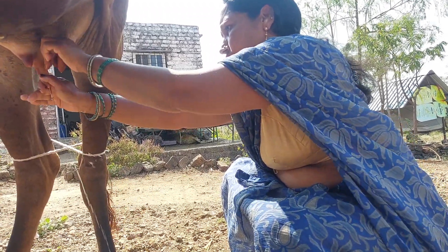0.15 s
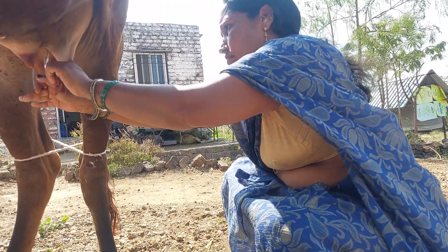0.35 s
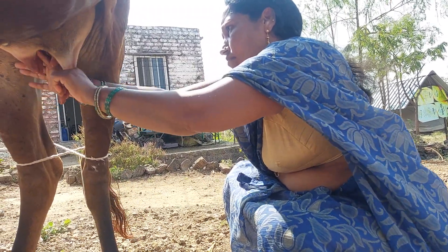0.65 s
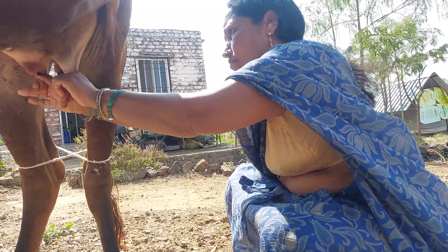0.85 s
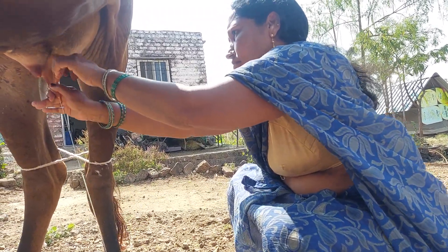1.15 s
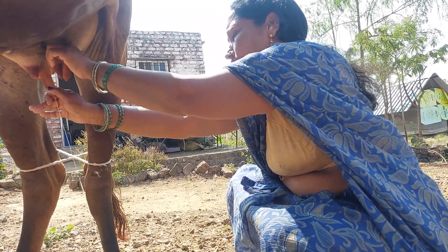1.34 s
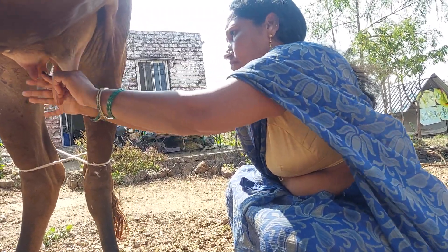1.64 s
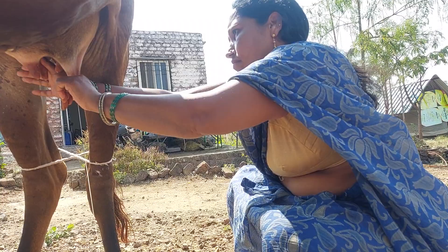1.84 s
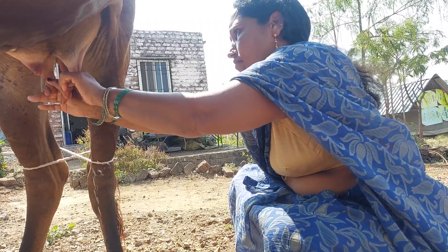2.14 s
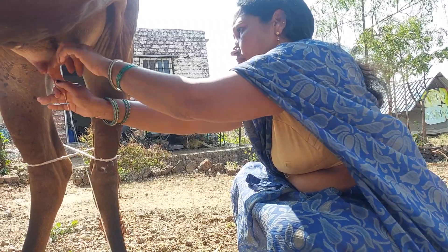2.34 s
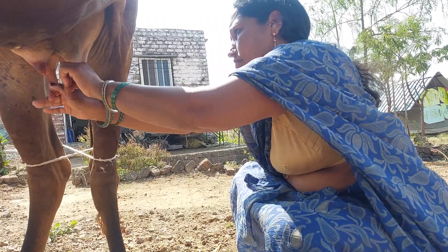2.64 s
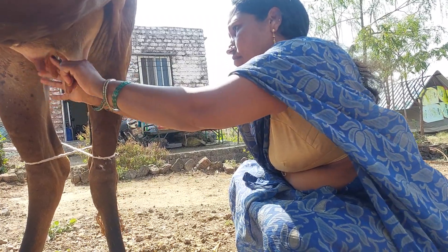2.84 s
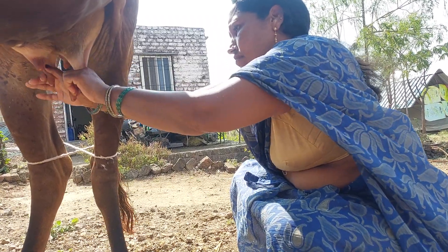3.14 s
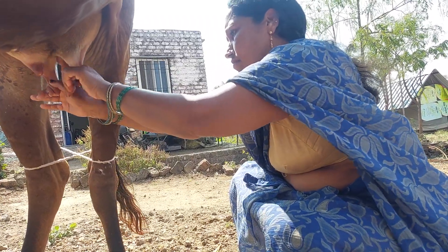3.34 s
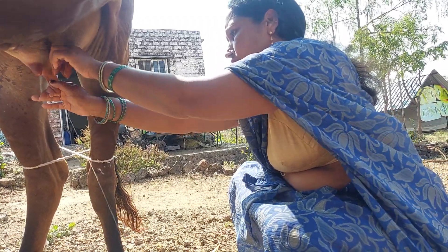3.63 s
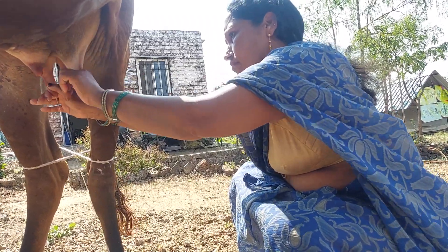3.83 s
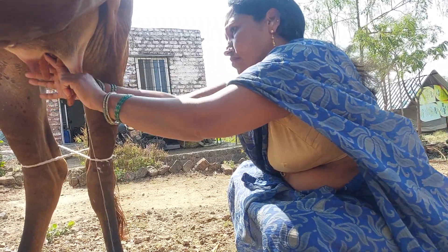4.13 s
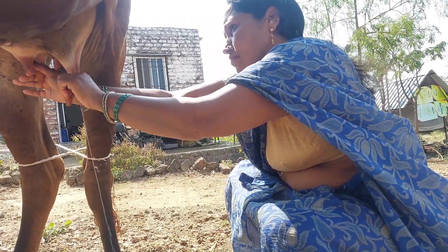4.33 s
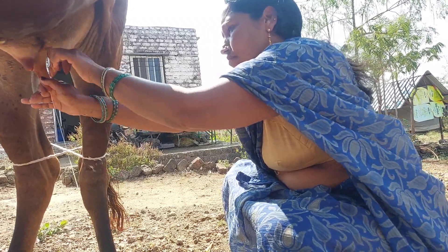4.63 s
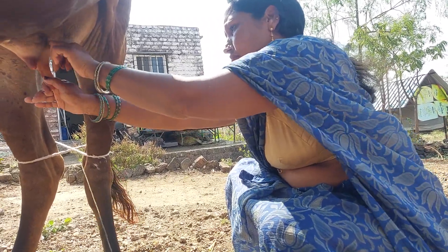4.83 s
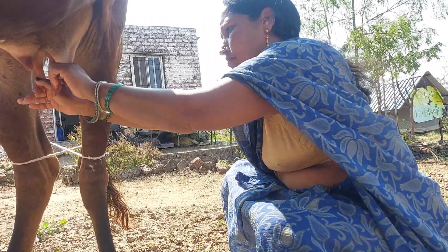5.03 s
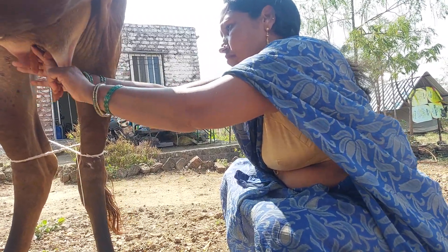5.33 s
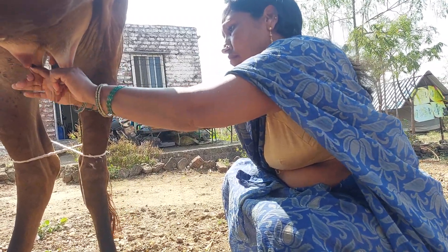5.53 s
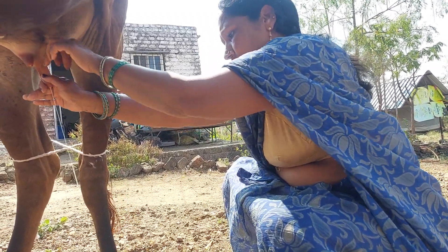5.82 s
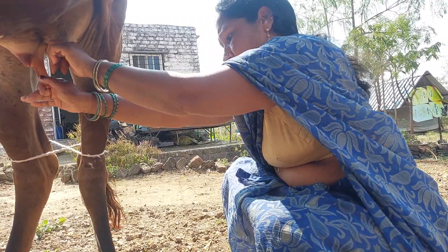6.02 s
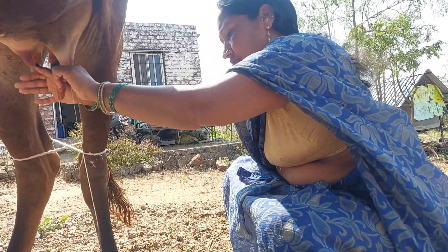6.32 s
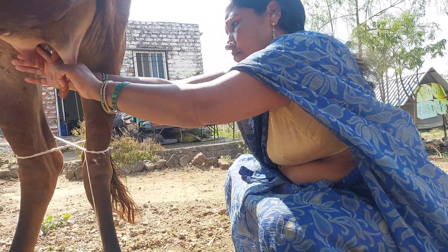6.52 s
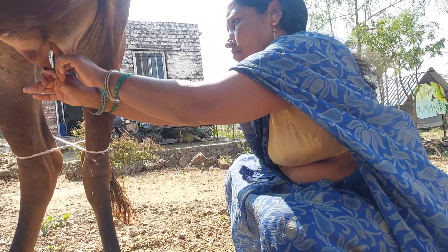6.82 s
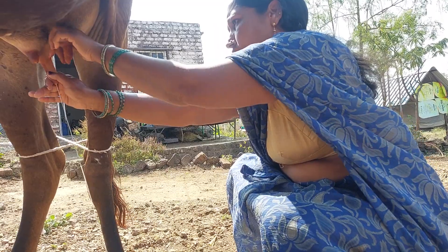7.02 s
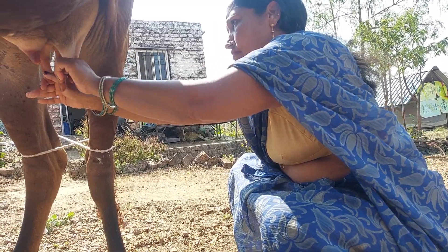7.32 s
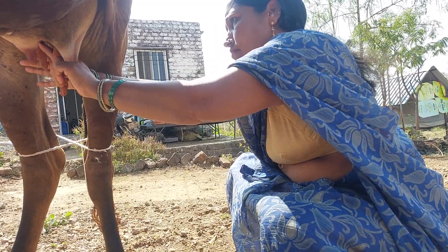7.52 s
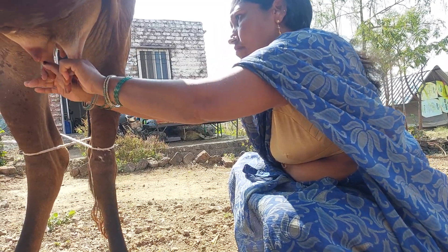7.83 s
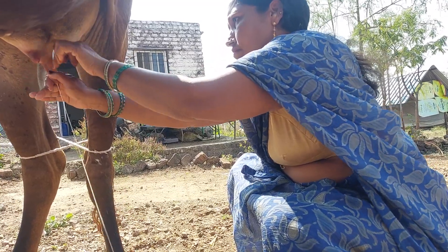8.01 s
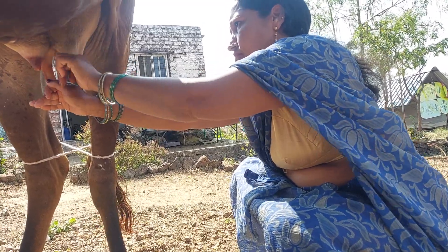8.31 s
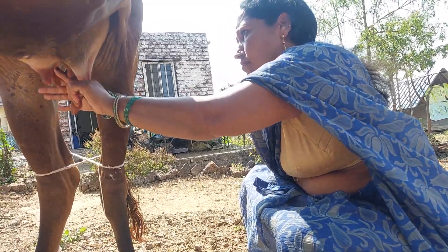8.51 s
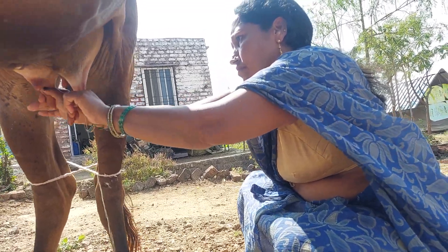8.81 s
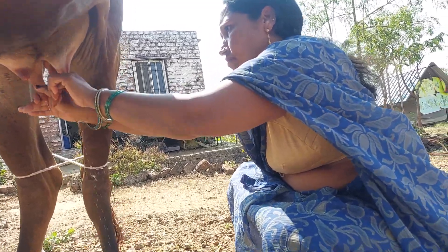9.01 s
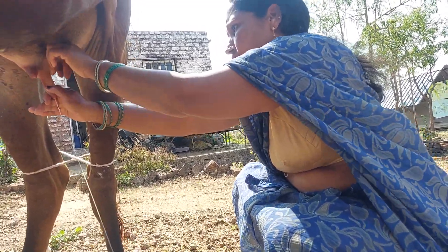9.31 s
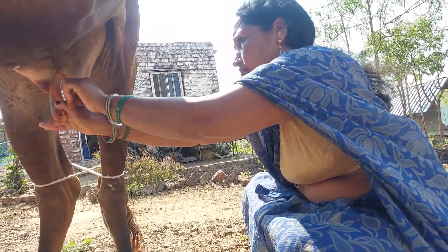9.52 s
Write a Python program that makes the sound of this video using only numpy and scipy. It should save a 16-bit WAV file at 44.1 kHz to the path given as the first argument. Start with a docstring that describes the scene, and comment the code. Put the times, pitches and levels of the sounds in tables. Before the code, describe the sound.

Hand milking is heard close up in an open yard through a phone microphone. From the start, five jets of milk squirt into a metal pail about 0.6 seconds apart, each hissing into foam and drumming on the wall, with wet splats and small ringing knocks. The squirts pause from about 2.8 to 3.5 seconds, then resume less evenly and sound slightly hollower. Sharper spurts stand out near 4.7, 5.9, 7 and 8.1 seconds. A longer, softer stream follows at 8.6, then quick, strong spurts around 9.3 seconds. Gusty wind rumbles on the microphone throughout, bumping harder near 1, 4, 5.4, 6.6 and 9.1 seconds. Glass bangles tick lightly a few times, most clearly around 4.2, 6.9 and 8 seconds. Faint high bird whistles come at 1.5 and 3 seconds, and distant falling calls near 4.6 and 8.7, over a soft outdoor hiss.

```python
"""Open yard, hand milking: each squeeze sends a lumpy jet of milk into a metal pail.
The jet drums on the wall (ringing near 1.1 kHz), blows the air space and sprays into the foam;
fat drops knock, splats crack and ring as bubbles. Gusty wind buffets a phone's two microphone ports.
Glass bangles tick, birds whistle now and then, the yard hisses faintly."""
import sys
import numpy as np
from scipy import signal
from scipy.fft import rfft, irfft
from scipy.io import wavfile
from scipy.ndimage import uniform_filter1d

SR = 44100
rng = np.random.default_rng(int(sys.argv[2]) if len(sys.argv) > 2 else 0)


def to_wav(s):
    """Save 16-bit WAV."""
    ch = np.atleast_2d(s).T  # columns
    pcm = np.round(np.clip(ch, -1, 1) * 32767)  # PCM
    wavfile.write(sys.argv[1], SR, pcm.astype(np.int16))


N = 426006

# treble bands of fine spatter and splat cracks: f/Hz, width/Hz, relative gain/dB
SPATTER_MODES = [(10400, 2850, -5.5), (11040, 1570, -6), (13360, 1200, -5), (13000, 5700, -7.5),
                 (14830, 580, 1)]


def undb(db):
    return 10 ** (np.asarray(db) / 20)


def unit(x):
    """Scale to rms 1."""
    return x / np.sqrt(np.mean(x ** 2))


def even(x, span_s):
    """Divide by the running rms to remove slow swells."""
    return x / np.sqrt(uniform_filter1d(x ** 2, int(span_s * SR)) + 1e-12)


def curves(table):
    """Interpolate columns over the first (t/s), one value a sample."""
    times_s, *columns = np.transpose(table)
    return [np.interp(np.arange(N) / SR, times_s, column) for column in columns]


def add(out, start_s, sound):
    """Mix in a short sound."""
    i = int(start_s * SR)
    out[i:i + len(sound)] += sound[:N - i]


def ring(x, hz, width_hz):
    """Two-pole resonance, gain 1 at the centre."""
    return signal.lfilter(*signal.iirpeak(min(hz, .45 * SR), hz / width_hz, fs=SR), x)


def steep(x, hz, width_hz):
    """Two resonances in series, the second twice as wide."""
    return ring(ring(x, hz, width_hz), hz, 2 * width_hz)


def walk(rate_hz):
    """Random steps, smoothed twice; spread near 1."""
    hold = int(SR / rate_hz)
    steps = np.repeat(rng.standard_normal(N // hold + 1), hold)
    return 1.16 * uniform_filter1d(uniform_filter1d(steps, hold), hold)[:N]


def puffs(rate_hz, spread_db, tail_s):
    """Envelope of random puffs: quick starts, capped sizes, short tails; rms 1."""
    size_db = spread_db * np.minimum(rng.exponential(size=N), 3.2)
    starts = (rng.random(N) < rate_hz / SR) * undb(size_db) ** 2
    power = signal.lfilter([1], [1, -np.exp(-1 / (tail_s * SR))], starts)
    power = uniform_filter1d(power, int(.36 * tail_s * SR) + 1)
    return unit(np.sqrt(np.maximum(power, 0)))


def burst(decay_s, rise_s):
    """Time axis and envelope of one impact, peak 1."""
    t = np.arange(int(.05 * SR)) / SR
    shape = np.exp(-t / decay_s) * (1 - np.exp(-t / rise_s))
    return t, shape / shape.max()


def ports(x, left_db, right_db, lag_s):
    """Place a sound at the two ports; the right hears it later."""
    hz = np.fft.rfftfreq(N, 1 / SR)
    left, right = x * np.ones((2, 1))
    delayed = irfft(rfft(right) * np.exp(-2j * np.pi * hz * lag_s), N)
    return np.array([undb(left_db) * left, undb(right_db) * delayed])


def port_noise(coherence):
    """White noise at both ports, a share of its power in common."""
    common, left, right = rng.standard_normal((3, N))
    return np.sqrt(coherence) * common + np.sqrt(1 - coherence) * np.array([left, right])


def struck_modes(modes, lumps, rate_hz, spread_db, tail_s, drop_gain, coherence):
    """Resonances, each driven by the common lumps plus its own droplets; rms 1."""
    out = 0
    for hz, width_hz, db in modes:
        hits = lumps + drop_gain * puffs(rate_hz, spread_db, tail_s)
        out += undb(db) * steep(hits * port_noise(coherence), hz, width_hz)
    return unit(out)


def yard():
    """Smooth distant hiss, independent at each port."""
    spectrum = [(400, -37), (600, -17.5), (1020, -15), (2540, -9.5), (3340, -13), (4660, -10.5),
                (8330, -19), (11800, -19.5), (16000, -20)]  # hiss colour: f/Hz, relative density/dB
    swells = [(0, 4), (.3, -1), (.5, -6), (.7, 1.5), (2.3, 0.5), (2.95, 1), (3.35, -2.5), (3.7, -1),
              (5.2, 1), (5.5, 1), (6.3, -1), (7.45, -0.5), (8.5, 2), (9.66, 1)]  # hiss drift: t/s, relative level/dB
    left_db, right_db = -89, -60.5
    hz, db = np.transpose(spectrum)
    bins_hz = np.maximum(np.fft.rfftfreq(N, 1 / SR), 1)
    colour = undb(np.interp(np.log(bins_hz), np.log(hz), db))
    swell_db, = curves(swells)
    out = []
    for port_db in (left_db, right_db):
        gain = undb(port_db + swell_db + .27 * walk(rate_hz=7.4))
        hiss = irfft(colour * rfft(rng.standard_normal(N)), N)
        out.append(gain * unit(hiss))
    return np.array(out)


def birds():
    """Near-sine whistles that the air makes waver, faded at both ends."""
    whistles = [
        [(1.49, 4100, -80), (1.558, 4090, -60), (1.6, 4020, -59)],
        [(2.9, 4150, -62), (2.94, 4170, -59.5), (3.04, 4115, -59), (3.08, 4000, -88)],
    ]  # high calls, one list each: t/s, f/Hz, level/dB
    far_calls = [
        [(4.585, 1340, -64), (4.62, 1320, -58)],
        [(4.63, 1295, -62), (4.685, 1260, -68)],
        [(8.55, 1370, -69), (8.63, 1295, -68)],
        [(8.73, 1295, -60), (8.88, 1275, -73)],
    ]  # distant falling calls, one list each: t/s, f/Hz, level/dB
    waver_db, fade_s = 3, .015
    out, t = np.zeros(N), np.arange(N) / SR
    for call in whistles + far_calls:
        hz, db = curves(call)
        gate = np.clip(np.minimum(t - call[0][0], call[-1][0] - t) / fade_s, 0, 1)
        tone = np.sin(2 * np.pi * np.cumsum(hz) / SR)
        out += gate * undb(db + waver_db * walk(rate_hz=30)) * tone
    return out


def gusts():
    """Amplitudes of rumble and flutter: a breeze with bell-shaped buffets on top."""
    breeze = [(0.0, -49.5, -59), (.6, -55.5, -60), (.85, -40.5, -51), (1.53, -49.5, -60.5),
              (2.93, -43.5, -46), (3.33, -59.5, -67), (4.12, -47.5, -47), (4.4, -51, -57.5),
              (4.81, -45, -53), (5.2, -58, -55), (6.05, -52, -60), (6.3, -59, -64), (6.65, -47, -50),
              (6.95, -59.5, -72.5), (7.04, -75, -62), (7.13, -70, -64), (7.25, -50, -64), (7.42, -66, -58),
              (7.75, -59, -62.5), (8.6, -62, -62), (9.05, -45, -51.5), (9.66, -50, -52.5)]  # steady wind: t/s, rumble/dB, flutter/dB
    buffets = [(0.161, -41, -50, 0.059), (0.252, -45.5, -51, 0.064), (.5, -46.5, -74, 0.017),
               (0.745, -35.5, -43.5, 0.024), (1.062, -30.5, -33, 0.057), (1.24, -43, -65, 0.036),
               (1.38, -48, -65, 0.034), (1.5, -37, -37.5, 0.045), (1.824, -41, -41, 0.058),
               (2.109, -53, -41, 0.034), (2.518, -37, -47, 0.017), (2.64, -47, -56, 0.018),
               (2.873, -39, -40, 0.066), (2.986, -41.5, -41, 0.094), (3.351, -46, -70, 0.018),
               (3.5, -43.5, -70, 0.028), (3.856, -49, -51, .06), (4.028, -31.5, -35.5, 0.028),
               (4.249, -37.5, -39.5, 0.068), (4.657, -43, -38.5, 0.063), (4.751, -39.5, -41, 0.028),
               (4.929, -44, -43, 0.054), (5.128, -37, -46.5, 0.039), (5.448, -31, -43.5, 0.026),
               (5.624, -51, -70.5, .04), (6.103, -45, -52.5, 0.047), (6.412, -40, -52, 0.032),
               (6.595, -32.5, -47, 0.051), (6.89, -44.5, -67, 0.037), (7.189, -44, -42, 0.041),
               (6.982, -53, -73, 0.017), (7.447, -52, -64, 0.023), (7.516, -50.5, -63, 0.024),
               (7.627, -50, -52.5, 0.071), (8.053, -49, -54, 0.047), (8.16, -56, -49, 0.027),
               (8.846, -44.5, -47.5, 0.06), (9.01, -38.5, -57, 0.056), (9.15, -35, -34, 0.042),
               (9.26, -41, -57, 0.086), (9.453, -42.5, -43, 0.047)]  # blows on the ports: peak t/s, rumble/dB, flutter/dB, length/s
    t = np.arange(N) / SR
    power = undb(curves(breeze)) ** 2
    for peak_s, rumble_db, flutter_db, length_s in buffets:
        bell = np.exp(-(2 * (t - peak_s) / length_s) ** 2)
        power += undb([[rumble_db], [flutter_db]]) ** 2 * bell
    return np.sqrt(power)


def wind():
    """Eddies burst on each port separately: rumble and flutter; the left cavity rings more."""
    direction = [(0.0, -6.5), (0.51, -6), (1.13, -3.5), (1.58, -7.5), (4.44, -9.5), (6.86, -6.5),
                 (7.53, -10.5), (9.66, -9)]  # side the wind comes from: t/s, left minus right/dB
    cavities_db, flutter_lean_db = (-2.5, -10), 1.8
    rumble_gain, flutter_gain = gusts()
    pan_db, = curves(direction)
    lowpass = signal.butter(4, 540, fs=SR, output="sos")
    rumble_noise, flutter_noise = port_noise(coherence=.05), port_noise(coherence=.05)
    out = []
    for port, side in enumerate((1, -1)):
        eddies = undb(4.5 * walk(rate_hz=35))
        rumble = ring(ring(rumble_noise[port], hz=50, width_hz=53), hz=90.6, width_hz=90)
        rumble = even(eddies * rumble, span_s=.09)
        pulses = flutter_noise[port] * puffs(rate_hz=70, spread_db=4.5, tail_s=.004)
        cavity = undb(cavities_db[port]) * unit(steep(pulses, hz=349.5, width_hz=144))
        flutter = unit(steep(pulses, hz=286, width_hz=220)) + cavity
        flutter = even(eddies * flutter, span_s=.15)
        gust = rumble_gain * rumble + flutter_gain * undb(side * flutter_lean_db) * flutter
        out.append(signal.sosfilt(lowpass, gust * undb(side * pan_db / 2)))
    return np.array(out)


def bangles():
    """Thin glass rings touch: a close pair of short, high modes."""
    touches = [(1.6661, -58, 11300), (1.7444, -59, 11100), (3.2774, -57, 11400), (3.3094, -60, 10200),
               (3.4231, -52, 11300), (4.1624, -45, 11170), (6.9394, -44.5, 11200), (7.999, -48, 11340)]  # ticks: t/s, level/dB, f/Hz
    out = np.zeros(N)
    t, shape = burst(decay_s=.0052, rise_s=.00087)
    for start_s, db, hz in touches:
        phase = 2 * np.pi * hz * t
        add(out, start_s, undb(db) * shape * (np.sin(phase) + 1.1 * np.sin(.92 * phase)))
    return out


def jet():
    """Amplitudes of foam, wall, spatter and air space: each squeeze swells, sags, stops, drips out."""
    # teat squeezes: t/s, swell/s, length/s, foam level/dB, sag/dB, then re foam: wall/dB, spatter/dB, air/dB
    squeezes = [(0.0, 0.023, 0.32, -50, 19.5, 0, -4, -3), (0.603, 0.28, 0.49, -56, 5.5, -5.5, -3, -5),
                (1.181, 0.053, 0.37, -48.5, 6.5, -1.5, -4.5, -4),
                (1.821, 0.099, 0.41, -52.5, 5.5, -1.5, -4.5, -3.5),
                (2.375, 0.083, 0.33, -48.5, 6.5, -1, -7.5, -5),
                (3.55, 0.093, 0.26, -59, 15.5, -5.5, -1.5, 2.5), (3.832, 0.029, 0.22, -54, 10, 2, -3.5, 4),
                (4.083, 0.078, 0.59, -57.5, 8.5, -4.5, -2, 0.5),
                (4.707, 0.057, 0.31, -45.5, 16, -0.5, -7, 2), (5.258, 0.034, 0.47, -61.5, 6.5, -3.5, -3, 0),
                (5.836, 0.12, 0.32, -46, 10.5, 1, -6.5, -2),
                (6.397, 0.024, 0.43, -58.5, 12, -3.5, 0.5, 4.5),
                (7, 0.085, 0.13, -46.5, 5.5, -1.5, -3, 0.5),
                (7.149, 0.016, 0.16, -57.5, 0.5, -1.5, -5.5, 5.5),
                (7.534, 0.036, 0.46, -59, 19, -1, 0, 3.5), (7.877, 0.014, 0.05, -63.5, -5.5, 4.5, -10, 7),
                (8.063, 0.027, 0.12, -40.5, 2, -3, -7.5, -1.5), (8.198, 0.036, 0.048, -49.5, 3, -6, -6, 6),
                (8.272, 0.023, 0.062, -66, -1, 12, -1, 2), (8.569, 0.094, 0.71, -57, 21, 1.5, -2, 3.5),
                (9.211, 0.046, .31, -50, 6.5, -2.5, -2.5, 0.5),
                (9.295, 0.0089, 0.042, -36, 19.5, -1.5, -14, 1), (9.393, .01, 0.053, -40, 15.5, 1, -17, 1),
                (9.627, 0.033, .1, -59, -5, 3, -0.5, 7)]
    dribble = (-80.5, -0.5, -1, -3)  # constant floor: foam level/dB, then re foam: wall/dB, spatter/dB, air/dB
    onset_db = 13  # start, below the peak
    cut_db, cut_s, drip_db_per_s = 11, .014, 58  # the hand lets go, the last drops die away
    lead_db, lead_s = 18.5, .0083  # the first thin thread is all fine spatter
    t = np.arange(N) / SR
    floor_db, *offsets_db = dribble
    power = np.ones((4, N)) * undb(floor_db + np.array([0, *offsets_db]))[:, None] ** 2
    for start_s, swell_s, length_s, level_db, sag_db, wall_db, spatter_db, air_db in squeezes:
        age_s = t - start_s
        corners_s = [0, swell_s, length_s, length_s + cut_s]
        db = level_db - np.interp(age_s, corners_s, [onset_db, 0, sag_db, sag_db + cut_db])
        db -= drip_db_per_s * np.maximum(age_s - length_s, 0)
        thread_db = lead_db * np.exp(-np.maximum(age_s, 0) / lead_s)
        layers_db = [db, db + wall_db - thread_db, db + spatter_db + thread_db, db + air_db]
        power += (age_s >= 0) * undb(layers_db) ** 2
    return np.sqrt(power)


def spatter(lumps):
    """The finest droplets crackle in the treble."""
    ticks = puffs(rate_hz=160, spread_db=6, tail_s=.0008)
    return struck_modes(SPATTER_MODES, .5 * lumps + ticks, rate_hz=150, spread_db=3.5, tail_s=.0015,
                        drop_gain=.6, coherence=.4)


def splats():
    """Single loud splats: a bubble rings briefly in a puff of splash, with a treble crack."""
    impacts = [(.066, -41, 2100, -54), (.1015, -43, 4770, -63), (0.255, -57, 4240, -31.5),
               (.789, -47, 3800, -64), (1.0286, -50, 5000, -60), (1.119, -63, 1870, -39),
               (1.1802, -51, 5360, -38), (1.197, -43, 5400, -57), (1.23, -34, 2980, -58),
               (1.2745, -53, 2200, -28), (1.332, -48, 3860, -24), (2.0971, -45, 2030, -65),
               (2.188, -49, 5870, -68), (2.3117, -67, 6160, -39), (2.4533, -41, 2190, -57),
               (2.5044, -41, 3870, -53), (2.7175, -54, 2240, -36), (3.466, -63, 6140, -39),
               (3.8315, -66, 5130, -39), (4.1628, -40.5, 2020, -35), (4.1844, -38, 2040, -53),
               (4.27, -45, 5160, -58), (4.2905, -40, 2140, -66), (4.4076, -46.5, 5170, -64),
               (4.428, -49, 1470, -70), (4.486, -49, 3660, -32), (4.6574, -55, 2620, -40),
               (5.031, -55, 4350, -36.5), (5.7783, -65, 6230, -46), (5.8405, -46, 5140, -60),
               (5.9377, -42, 2110, -56), (6.1596, -42, 2060, -68), (6.4007, -53, 5920, -40),
               (6.78, -69, 5770, -34), (6.923, -65, 6120, -42), (6.94, -56, 5830, -36),
               (6.992, -52, 3730, -51), (7.0575, -42, 5400, -20.5), (7.165, -38.5, 4770, -34),
               (7.2908, -47.5, 5500, -68), (7.614, -48, 2000, -66), (7.89, -46.5, 2400, -72),
               (8.001, -53, 5600, -40), (8.0331, -62, 6060, -51), (8.0476, -58, 4820, -35),
               (8.068, -45, 3780, -22.5), (8.2412, -43, 2460, -65), (8.4635, -50.5, 4900, -72),
               (9.1486, -64, 2100, -47), (9.2174, -52, 2490, -32), (9.3006, -37, 3460, -25.5),
               (9.406, -41, 5500, -52)]  # splats: t/s, bubble level/dB, bubble f/Hz, crack level/dB
    bubbles, snaps = np.zeros(N), np.zeros(N)
    t, shape = burst(decay_s=.003, rise_s=.0007)
    _, snap = burst(decay_s=.002, rise_s=.0002)
    for start_s, bubble_db, hz, crack_db in impacts:
        rising_tone = np.sin(2 * np.pi * hz * t * (1 + 4 * t))
        splash = unit(ring(rng.standard_normal(len(t)), 1.2 * hz, .8 * hz))
        add(bubbles, start_s, undb(bubble_db) * shape * (rising_tone + .7 * splash))
        add(snaps, start_s, undb(crack_db) * snap)
    cracks = sum(undb(db) * steep(snaps * port_noise(coherence=.45), hz, width_hz)
                 for hz, width_hz, db in SPATTER_MODES)
    return bubbles, .78 * cracks


def foam(lumps):
    """Dense droplets spray into the foam."""
    modes = [(3090, 870, -0.5), (3554, 240, -1.5), (3830, 130, 6), (4040, 320, -0.5), (4240, 220, 3),
             (4580, 130, 1), (4816, 150, 3), (5190, 330, 0), (5625, 330, -2), (6270, 910, -6.5),
             (7140, 740, -12)]  # spray resonances: f/Hz, width/Hz, relative gain/dB
    return struck_modes(modes, lumps, rate_hz=50, spread_db=5, tail_s=.005, drop_gain=1.2, coherence=.5)


def knocks():
    """Fat drops ring the pail for some cycles; a wet blow is never a pure tone."""
    drops = [(0.029, -34.5), (.135, -38), (1.259, -34), (1.298, -39), (1.391, -34), (1.414, -32.5),
             (1.439, -36.5), (1.537, -44), (.953, -50.5), (2.121, -41), (2.481, -38), (2.517, -39),
             (2.607, -39), (2.627, -37.5), (2.704, -39), (3.678, -51.5), (3.984, -42.5), (4.541, -46.5),
             (4.779, -38.5), (4.829, -40.5), (5.938, -27.5), (6.004, -36.5), (6.036, -39.5), (6.083, -35),
             (7.045, -40.5), (7.225, -39.5), (7.261, -43), (7.89, -44.5), (8.127, -34), (8.147, -42),
             (8.285, -42.5), (8.311, -40), (8.463, -49), (9.302, -48), (9.404, -47)]  # fat drops: t/s, level/dB
    centre_hz, scatter_hz = 1084, 23.8
    out = np.zeros(N)
    t, shape = burst(decay_s=.0087, rise_s=.00075)
    for start_s, db in drops:
        hz = centre_hz + scatter_hz * rng.standard_normal()
        phase = 2 * np.pi * hz * t
        slosh = unit(steep(rng.standard_normal(len(t)), .94 * hz, .5 * hz))
        add(out, start_s, undb(db) * shape * (np.sin(phase) + .13 * np.sin(1.6 * phase) + .23 * slosh))
    return out


def pail(lumps, wall_gain, air_gain):
    """The jet drums on the metal wall and blows the air space."""
    wall_modes = [(868, 68, -8.5), (1038, 88, -5.5), (1121, 98, -10), (1364, 143, -12), (1677, 210, -15),
                  (2013, 130, -10), (2243, 83, -5), (2484, 89, -13.5), (2736, 62, -6), (3000, 170, -19)]  # wall resonances: f/Hz, width/Hz, relative gain/dB
    air_modes = [(394.7, 29.5, -8), (654.8, 56, -10)]  # air resonances: f/Hz, width/Hz, relative level/dB
    drum = struck_modes(wall_modes, lumps, rate_hz=40, spread_db=3.1, tail_s=.011,
                        drop_gain=1, coherence=.93)
    hollow = sum(undb(db) * unit(steep(port_noise(coherence=.95), hz, width_hz))
                 for hz, width_hz, db in air_modes)
    return wall_gain * drum + uniform_filter1d(air_gain, int(.08 * SR)) * hollow


def scene():
    """Milk, bangles, birds, wind and yard at the two ports."""
    lag_s = .00015  # the pail is nearer the left port
    lumps = puffs(rate_hz=120, spread_db=5.5, tail_s=.0038)  # the jet arrives broken up
    foam_gain, wall_gain, spatter_gain, air_gain = jet()
    spray = foam_gain * foam(lumps)
    fine_spray = spatter_gain * spatter(lumps)
    bubbles, cracks = splats()
    body = pail(lumps, wall_gain, air_gain) + knocks()
    milking = (ports(body, left_db=1.2, right_db=-.6, lag_s=.75 * lag_s)
               + ports(spray + bubbles, left_db=1.8, right_db=3.5, lag_s=lag_s)
               + ports(fine_spray + cracks + bangles(), left_db=.3, right_db=5, lag_s=lag_s))
    return milking + ports(birds(), left_db=2.2, right_db=1.7, lag_s=.00003) + wind() + yard()


def record(dry):
    """The phone cuts the lowest bass and the top."""
    bottom_hz, top_hz = 38, 15900
    highpass = signal.butter(2, bottom_hz, "high", fs=SR, output="sos")
    lowpass = signal.ellip(8, .2, 70, top_hz, fs=SR, output="sos")
    return signal.sosfilt(lowpass, signal.sosfilt(highpass, dry))


dry = scene()
out = record(dry)
to_wav(out)
```